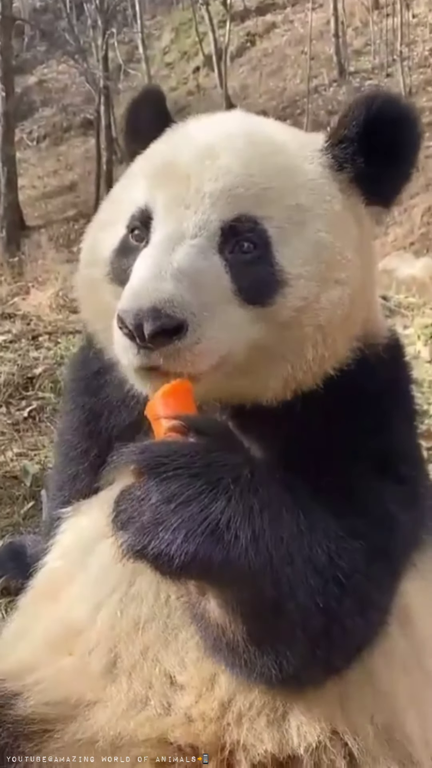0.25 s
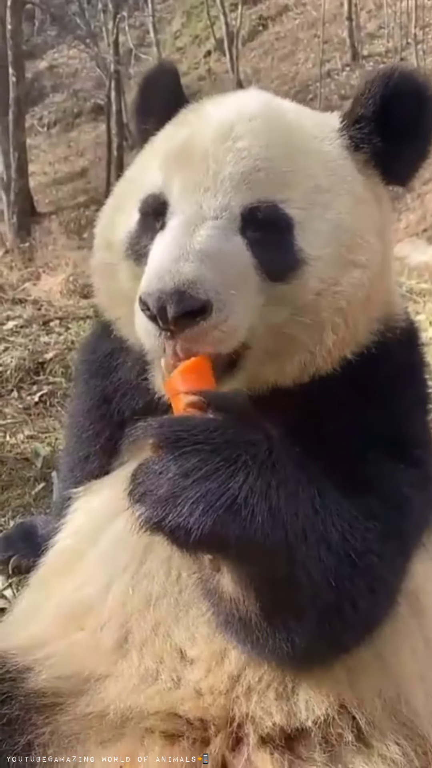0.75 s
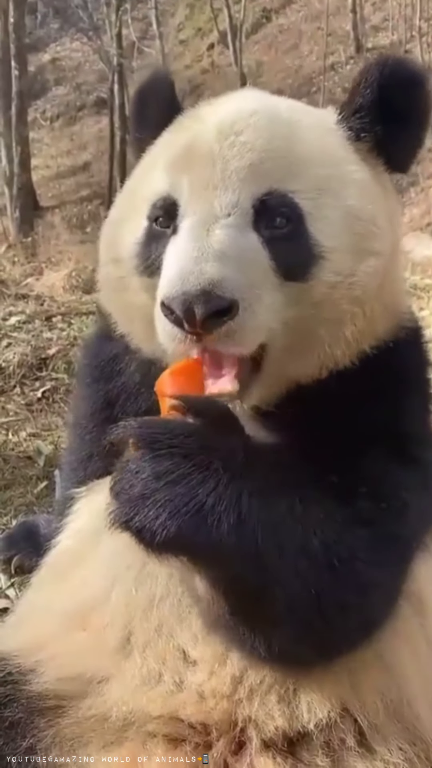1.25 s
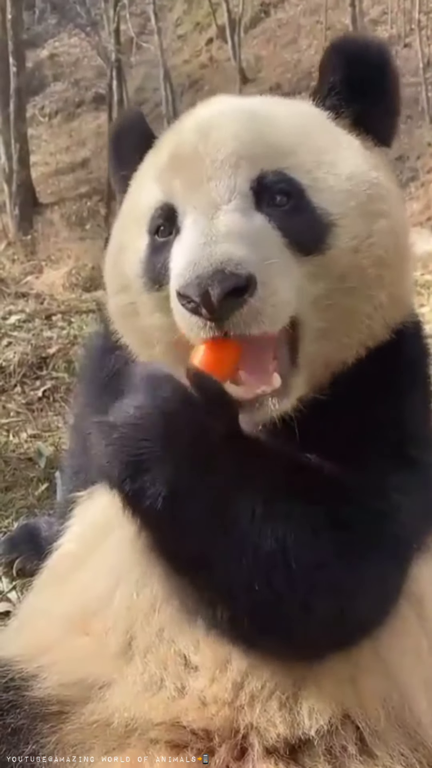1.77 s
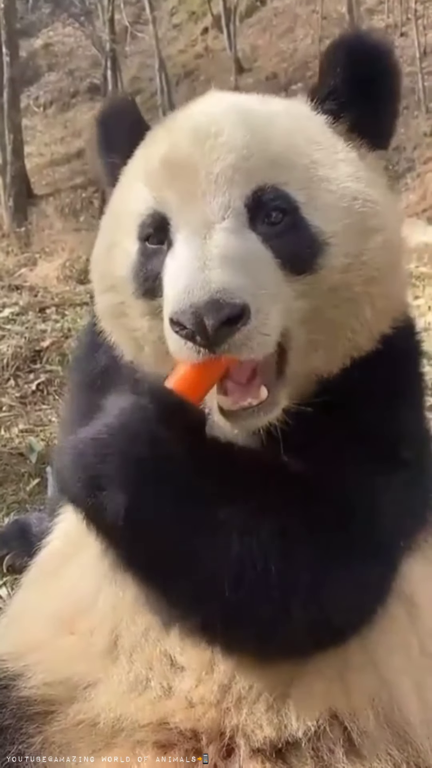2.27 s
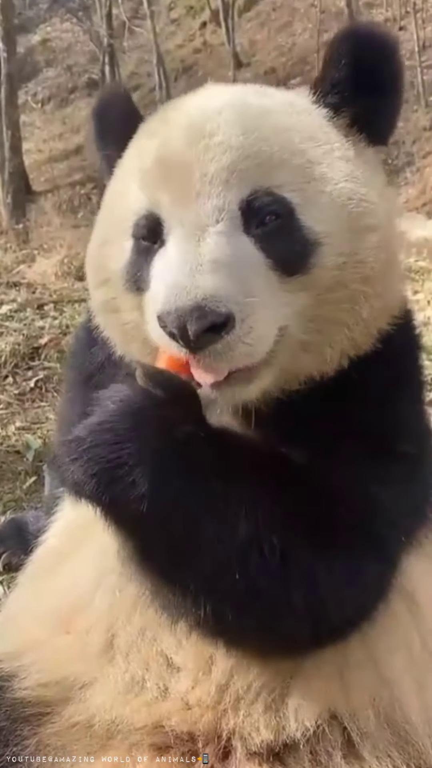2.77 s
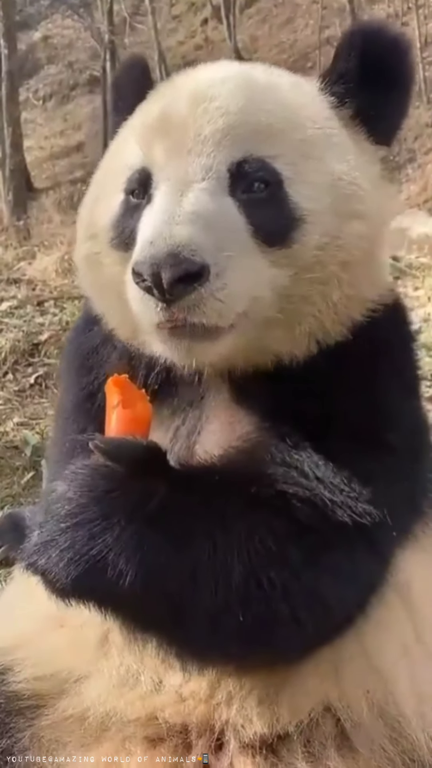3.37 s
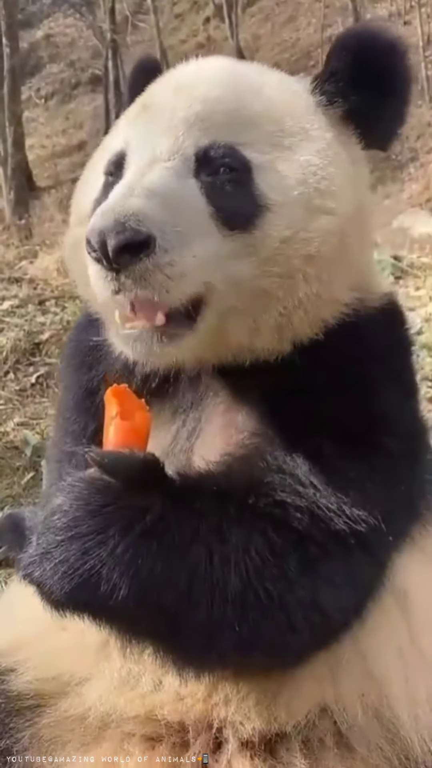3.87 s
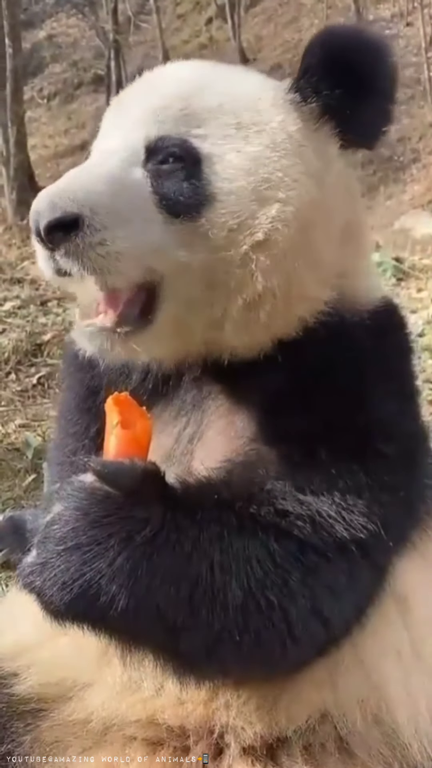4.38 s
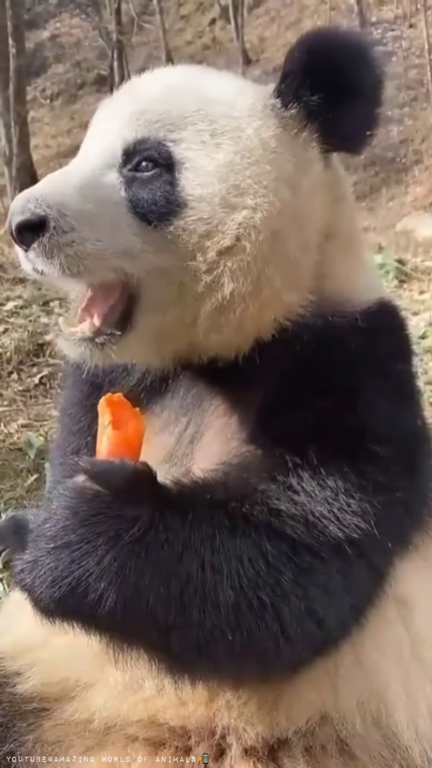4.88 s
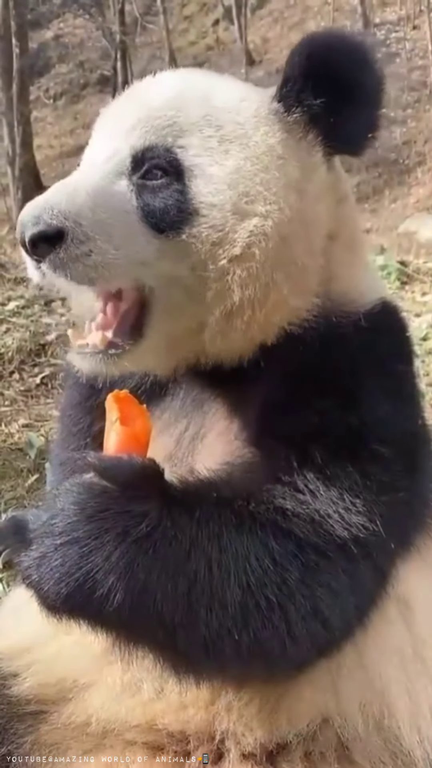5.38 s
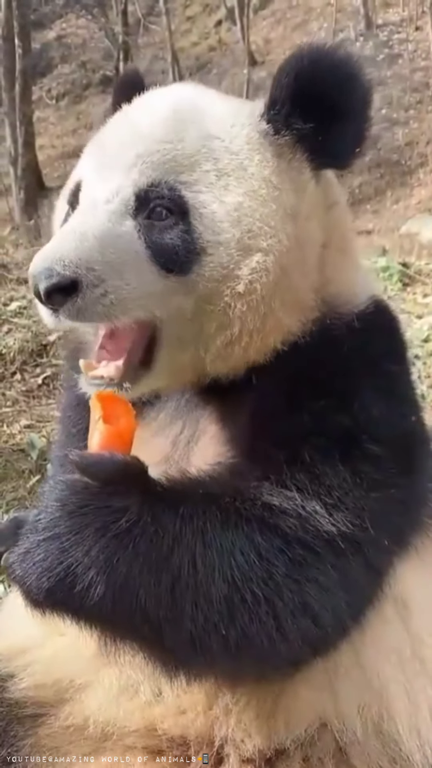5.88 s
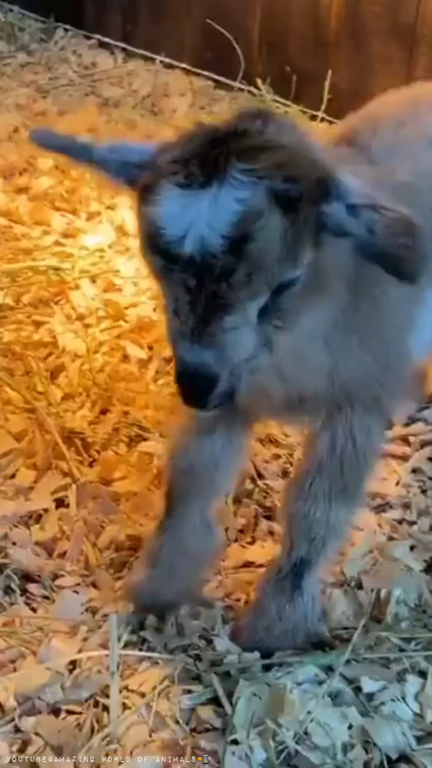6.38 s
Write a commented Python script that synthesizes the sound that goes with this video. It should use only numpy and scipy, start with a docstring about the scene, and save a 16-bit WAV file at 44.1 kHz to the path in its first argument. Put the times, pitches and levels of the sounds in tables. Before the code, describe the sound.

A panda chews raw carrot very close by, crisp wet open-mouthed crunches with a loud cracking bite midway, over faint outdoor hiss.

```python
"""Crisp, wet open-mouthed chewing is heard close by: a panda eats a raw carrot outdoors on a still day.
Halfway through it bites off a new piece with a loud crack, and chews on.
Each jaw stroke swells and ebbs as a swarm of tiny fractures and wet pops, filtered by the mouth's resonances.
Sharp snaps, ticks of the lips, plops of the tongue and dull knocks stand out singly as damped bursts and tones.
Beneath lie a low rustle and a faint hiss of air, both filtered noise; loud top treble is wider in stereo."""
import sys
import numpy as np
from scipy import signal
from scipy.fft import rfft, irfft
from scipy.io import wavfile
from scipy.ndimage import uniform_filter1d, map_coordinates

SR = 44100
rng = np.random.default_rng(int(sys.argv[2]) if len(sys.argv) > 2 else 0)


def file_out(sig):
    """Save sig as 16-bit WAV at sys.argv[1]."""
    # one column per channel
    cols = np.atleast_2d(sig).T
    # limit, then scale
    lim = np.clip(cols, -1, 1)
    pcm = np.round(lim * 32767).astype(np.int16)
    wavfile.write(sys.argv[1], SR, pcm)


N = 292824
TIME = np.arange(N) / SR  # [s]

# Strokes of the jaw: (start [s], pressing time [s], easing time [s], peak crunch level [dB],
# hollow of the mouth re crunch [dB], juicy fizz re crunch [dB], deep hollow [Hz], front cavity [Hz])
JAW_STROKES = [(0, 0.006, .13, -39, -3.5, -1.5, 710, 1770), (0.25, 0.013, 0.037, -27, -7.5, -5, 770, 2300),
               (0.402, 0.1, 0.051, -39, 2, -1.5, 740, 1830), (.562, .013, 0.038, -41.5, -5, -5, 710, 2080),
               (0.679, 0.021, 0.09, -38, -9.5, -2.5, 800, 1900),
               (0.851, 0.07, 0.092, -33.5, -3.5, 0, 770, 2370),
               (1.154, 0.027, 0.031, -29.5, -4, -4, 666, 1460),
               (1.313, 0.03, 0.065, -35, -11, -0.5, 770, 2440),
               (1.35, 0.081, 0.067, -42, -0.5, -7, 760, 2190),
               (1.454, 0.041, 0.0068, -42, -19, 2, 770, 2020),
               (1.57, 0.018, 0.21, -57.5, -7, 9.5, 810, 1870),
               (1.667, 0.031, 0.031, -35.5, -3, 2.5, 806, 1880),
               (1.891, 0.019, 0.13, -55, -5, 12, 777, 2220),
               (2.505, 0.029, 0.038, -41.5, -1, 14, 657, 2110),
               (2.581, 0.027, 0.036, -37.5, -10, 9.5, 566, 2230),
               (2.673, 0.014, 0.019, -38, -18, -5, 624, 2207), (3.026, 0.086, 0.11, -26, -8, -1, 734, 2270),
               (3.172, 0.037, 0.029, -39, -10, -1, 947, 1780),
               (3.361, 0.0096, 0.037, -34, -0.5, 0, 613, 1930),
               (3.526, 0.085, 0.084, -29, -7, 3, 800, 2170), (3.644, 0.033, 0.03, -37, 3, 0.5, 710, 2020),
               (3.786, 0.017, 0.054, -37.5, -10.5, -2.5, 603, 2530),
               (4.011, 0.075, 0.061, -37.5, -10.5, -0.5, 710, 2030),
               (4.08, 0.023, 0.081, -35.5, -1.5, -1.5, 653, 2550),
               (4.269, 0.017, 0.046, -31, -11.5, -2.5, 680, 1990),
               (4.469, 0.089, 0.067, -41, -7, -6, 890, 1750),
               (4.74, 0.023, 0.039, -30, -7.5, -4, 746, 1390),
               (4.932, 0.022, 0.082, -40, -4, -6, 810, 2040),
               (4.99, 0.067, 0.049, -43.5, -6.5, -8, 775, 2060),
               (5.185, 0.01, 0.068, -22, -15.5, -10.5, 980, 2200),
               (5.26, 0.023, 0.013, -32, -5.5, -6.5, 770, 1610),
               (5.422, 0.055, 0.094, -33, -3, 1, 850, 2170), (5.589, 0.013, 0.012, -39.5, -5, 0, 740, 2300),
               (5.649, .012, 0.067, -48.5, -15, -12.5, 746, 2070),
               (5.712, 0.053, 0.016, -33, -8, -2, 695, 1720),
               (5.901, 0.081, 0.068, -32.5, -4, 0.5, 783, 2350),
               (6.074, 0.018, 0.02, -42, -15.5, -5, 753, 2204)]


def gain_of(db):
    """The decibel is logarithmic: 20 dB is a factor of ten in amplitude."""
    return 10 ** (np.asarray(db) / 20)


def evened(x):
    """Normalization by the root mean square, which measures mean power: scales to rms 1."""
    return x / np.sqrt(np.mean(x ** 2) + 1e-20)


def steadied(x, size=1300):
    """Short-time power normalization: a window of size samples evens the level but keeps single grains."""
    power = uniform_filter1d(uniform_filter1d(x ** 2, size), size)
    return x / np.sqrt(abs(power) + 1e-20)


def follow(rows, t):
    """Linear interpolation: each column of a curve at the times t."""
    s, *columns = np.transpose(rows)
    return [np.interp(t, s, column) for column in columns]


def add(mix, s, sound):
    """Superposition: sound pressures add, here from time s on."""
    part = mix[max(round(s * SR), 0):][:len(sound)]
    part += sound[:len(part)]


def band(x, lo_hz, hi_hz, order=2):
    """Causal band-pass filtering by a Butterworth response, flat inside the band."""
    sos = signal.butter(order, [lo_hz, min(hi_hz, .48 * SR)], "band", fs=SR, output="sos")
    return signal.sosfilt(sos, x)


def resonate(x, hz, width_hz):
    """A damped resonator of peak gain 1: a complex one-pole in a frame that turns with the moving pitch."""
    turn = np.exp(2j * np.pi * np.cumsum(hz * np.ones(len(x))) / SR)
    r = np.exp(-np.pi * width_hz / SR)
    ringing = signal.lfilter([1 - r], [1, -r], x / turn + 1e-18)
    return 2 * (turn * ringing).real


def air():
    """Stationary noise with a shaped spectrum: the faint steady hiss of the open air."""
    # Spectrum of the hiss: (frequency [Hz], relative level per Hz [dB])
    spectrum = [(20, -19), (50, 16), (100, 10.5), (250, 5), (700, -0.5), (4000, -6), (9000, -13),
                (13000, -8.5)]
    hz, db = np.transpose(spectrum)
    shape = gain_of(np.interp(np.log(np.fft.rfftfreq(N, 1 / SR) + 1), np.log(hz), db))
    hiss = irfft(rfft(rng.standard_normal(N)) * shape, N)
    return gain_of(-60) * evened(hiss)


def rustle():
    """Low-frequency friction noise under a slow envelope, as the animal shifts."""
    # Rustle of the moving body: (time [s], level [dB])
    envelope = [(0, -45), (.17, -48), (.36, -63), (.6, -109), (3.4, -64.5), (3.5, -51.5), (3.66, -50),
                (3.8, -68.5), (6.1, -85)]
    return gain_of(follow(envelope, TIME)[0]) * evened(band(rng.standard_normal(N), 110, 215))


def thud(hz, level_db, decay_s, halving_s):
    """A damped oscillation of sinking pitch with a little noise: a soft, dull knock."""
    t = np.arange(SR // 5) / SR
    turns = np.cumsum(hz * .5 ** (t / halving_s)) / SR
    knock = np.sin(2 * np.pi * turns) + .3 * evened(band(rng.standard_normal(len(t)), hz / 2, hz * 2))
    return gain_of(level_db) * knock * (1 - np.exp(-t / 0.00059)) * np.exp(-t / decay_s)


def tongue_db():
    """Amplitude envelope of the tongue working the pulp; it dips slightly before each stroke."""
    # Crunch level of the tongue's murmur before these dips: (time [s], level [dB])
    murmur = [(0, -52.5), (1.9, -58.5), (2.4, -70.5), (2.9, -59), (3.4, -55.5), (4.2, -61.5), (4.7, -55.5),
              (5.15, -62), (5.4, -52.5), (6.1, -59)]
    still_s, still_db = 0.055, -1.5  # the pause: time scale and depth
    pauses = [np.exp(-((TIME - start + still_s / 2) / still_s) ** 2) for start, *_ in JAW_STROKES]
    return follow(murmur, TIME)[0] + still_db * np.max(pauses, 0)


def strokes():
    """Incoherent sources add in power: strokes add to the tongue's murmur. Returns crunch, hollow and fizz [dB].

    The hollow and the fizz are relative to the crunch.
    """
    tongue_hollow_db, tongue_fizz_db = -4, 0.5  # re the tongue's crunch
    swell_db, ebb_db, arch_power = 13, 21, 1.63  # rise as the teeth press, fall as they ease
    attack_s, release_s = 0.0017, 0.01  # outside the arch: onset before it, decay after it
    # the mouth closes during a stroke: change from start to peak, and again from peak to end
    hollow_grows_db, fizz_fades_db = 4, 0.5
    power = gain_of(2 * (tongue_db() + np.array([[0], [tongue_hollow_db], [tongue_fizz_db]])))
    for start, press_s, ease_s, level_db, hollow_db, fizz_db, _, _ in JAW_STROKES:
        t = TIME - start - press_s  # zero at the peak
        phase = np.interp(t, [-press_s, 0, ease_s], [-1, 0, 1])
        arch_db = np.where(t < 0, swell_db, ebb_db) * abs(phase) ** arch_power
        edges = np.maximum(-t - press_s, 0) / attack_s + np.maximum(t - ease_s, 0) / release_s
        on = edges < 10
        hollow_now_db = hollow_db + hollow_grows_db * phase[on]
        fizz_now_db = fizz_db - fizz_fades_db * phase[on]
        colour_db = np.array([0 * phase[on], hollow_now_db, fizz_now_db])
        power[:, on] += (gain_of(level_db - arch_db[on] + colour_db) * np.exp(-edges[on])) ** 2
    crunch, hollow, fizz = 10 * np.log10(power)
    return crunch, hollow - crunch, fizz - crunch


def mouth_hz(t):
    """Cavity resonances shift with shape: deep hollow and front cavity glide from stroke peak to stroke peak."""
    shapes = [(start + press_s, deep, front) for start, press_s, *_, deep, front in JAW_STROKES]
    return follow(shapes, t)


def fractures(n, per_s, spread_db):
    """A random impulse process of bursting cells: many small clicks, a few large, of either sign."""
    chance, size, sign = rng.random((3, n))
    size_db = spread_db * np.minimum(-np.log(1 - size), 4)
    return (chance < per_s / SR) * gain_of(size_db) * np.where(sign < .5, -1, 1)


def tears(per_s, spread_db, decay_s, count=12):
    """Impulses convolved with decaying noise: a swarm of tearing cell walls in count random colours."""
    t = np.arange(SR // 150) / SR
    out = np.zeros(N)
    clicks = fractures(N, per_s, spread_db)
    kind = rng.integers(0, count, N)
    for k in range(count):
        tear = evened(rng.standard_normal(len(t)) * np.exp(-t / decay_s))
        out += signal.oaconvolve(clicks * (kind == k), tear)[:N]
    return evened(out)


def bubbles(per_s, spread_db, top_hz, ring_s, glide):
    """Damped resonance of popping juice films: low ones ring longer, and each slides up or down in pitch."""
    at = np.flatnonzero(rng.random(N) < per_s / SR)
    size, pitch, slide = rng.random((N, 3))[at].T[:, :, None]
    hz = 550 + (top_hz - 550) * pitch ** 2
    life = ring_s * np.sqrt(2000 / hz)  # ring_s is the decay time at 2000 Hz
    t = np.arange(SR // 90) / SR
    height = gain_of(spread_db * np.minimum(-np.log(1 - size), 3.5)) * np.sqrt(hz)
    turns = hz * t * (1 + glide * (slide - .5) * t / t[-1])
    pops = height * np.exp(-t / life) * np.sin(2 * np.pi * turns)
    places = at[:, None] + np.arange(len(t))
    return evened(np.bincount(places.ravel(), pops.ravel(), N)[:N])


def saliva(level_db):
    """Sparse impulsive ticks and pops of tongue and lips, which go on between the strokes."""
    ticks = band(tears(per_s=34, spread_db=12, decay_s=0.00038), 3200, 13000)
    pops = bubbles(per_s=45, spread_db=5, top_hz=4200, ring_s=0.0018, glide=0.2)
    return gain_of(0.51 * level_db) * (gain_of(-37) * ticks + gain_of(-31.0) * pops)


def tick(level_db):
    """An impulsive release as a film of saliva breaks between the lips: a tiny decaying burst of treble."""
    t = np.arange(SR // 50) / SR
    burst = rng.standard_normal(len(t)) * np.exp(-t / 0.0028)
    return gain_of(level_db) * band(burst, 4800, 11500) * 2


def plop(hz, level_db):
    """Cavity resonance: an opening pocket of air rings the deep hollow, with a little wet splash."""
    t = np.arange(SR // 20) / SR
    splash = gain_of(-6.5) * evened(band(rng.standard_normal(len(t)), 1100, 3300))
    ring = 2 * np.sin(2 * np.pi * hz * t)
    return gain_of(level_db) * (ring + splash) * (1 - np.exp(-t / 0.0015)) * np.exp(-t / 0.0036)


def snap(s, length_s, ring_hz, level_db, hollow_db, fizz_db):
    """Brittle fracture: a crack runs through the carrot in milliseconds and excites the mouth's resonances."""
    t = np.arange(SR // 20) / SR
    tearing = evened(fractures(len(t), per_s=4300, spread_db=7.0)) + .5 * rng.standard_normal(len(t))
    crack = tearing * (np.exp(-(t / length_s) ** 3) + gain_of(-14.5) * np.exp(-t / (length_s + 0.0015)))
    crack *= 1 - np.exp(-t / (0.067 * length_s))  # it gathers strength over a small share of its length
    deep_hz = mouth_hz(s)[0]
    crunch = evened(band(crack, 1700, 3200, order=3))
    front_ring = resonate(resonate(crack, ring_hz, 180), ring_hz, 900)
    crunch = evened(crunch + gain_of(7) * evened(front_ring))
    hollow = evened(band(crack, 580, 1800, order=3))
    deep_ring = resonate(resonate(crack, deep_hz, 72), deep_hz, 300)
    hollow = evened(hollow + gain_of(34.0) * evened(deep_ring))
    lips_hz = np.clip(12000 * gain_of(0.95 * fizz_db), 5800, 12400)  # nearly closed lips dull the top
    fizz = band(crack, 3900, lips_hz, order=3)
    overtone_hz = max(2 * ring_hz, 4400)  # a higher mode of the same cavity
    fizz = evened(fizz + resonate(fizz, overtone_hz, 1500))
    colour = crunch + gain_of(hollow_db) * hollow + gain_of(fizz_db) * fizz
    return gain_of(level_db) * np.sqrt(length_s / t[-1]) * colour  # the level holds over the crack's length


def clumps(depth_db, rate_hz):
    """Random amplitude modulation: the flesh gives way in fits, so the grains come in irregular clumps."""
    return gain_of(depth_db * np.tanh(evened(band(rng.standard_normal(N), rate_hz / 4, rate_hz))))


def chewing(level_db, hollow_db, fizz_db):
    """Source and filter: grains of ground pulp sound through front cavity, deep hollow and open lips."""
    deep_hz, front_hz = mouth_hz(TIME)
    dry = tears(per_s=1700, spread_db=4.0, decay_s=0.0011)
    wet = bubbles(per_s=3500, spread_db=4.5, top_hz=10910, ring_s=0.0036, glide=0.12)
    pulp = steadied(dry + gain_of(-7) * wet + gain_of(-7.0) * rng.standard_normal(N), size=900)
    crunch = steadied(band(pulp, 1050, 4380, order=3))
    front_ring = resonate(resonate(pulp, front_hz, 160), front_hz, 1100)
    crunch = steadied(crunch + gain_of(-6.5) * steadied(front_ring))
    hollow = band(pulp, 420, 1150, order=3)
    hollow = steadied(hollow + gain_of(7.0) * resonate(hollow, deep_hz, 62))
    fizz = band(pulp, 3250, 13000, order=4)
    lips_ring = gain_of(2.5) * resonate(fizz, 6300, 1800)
    fizz = steadied(gain_of(0.15 * fizz_db) * fizz + lips_ring)  # juicier is also brighter
    jaw = gain_of(-15.5) * steadied(band(dry, 240, 540))
    colour = crunch + gain_of(hollow_db) * (hollow + jaw) + gain_of(fizz_db) * fizz
    # the bulk of the head passes a dull grinding that grows more slowly than the crunch
    grinding = gain_of(-39.5 + 0.58 * level_db) * steadied(band(rng.standard_normal(N), 64, 140))
    return gain_of(level_db) * clumps(depth_db=3.0, rate_hz=57.3) * colour + grinding


def shifting(x, patchy_db, size=128):
    """Time-varying filtering: air pockets between sliding morsels lift and damp narrow bands for a moment."""
    z = signal.stft(x, nperseg=2 * size, noverlap=3 * size // 2)[2]
    patches = rng.standard_normal(z.shape)
    for _ in range(2):
        patches = uniform_filter1d(patches, size=3, axis=0)  # across frequency
        patches = uniform_filter1d(patches, size=12, axis=1)  # across time
    colour = evened(gain_of(patchy_db * np.clip(evened(patches), -2, 2)))
    return signal.istft(z * colour, nperseg=2 * size, noverlap=3 * size // 2)[1][:N]


def palate(x, delays_s, echo_db, sway):
    """Comb-filter interference: short echoes between teeth, palate and paw; paths change as the head moves."""
    out = x.copy()
    for k, delay_s in enumerate(delays_s):
        swing = np.sin(2 * np.pi * (TIME * rng.uniform(.5, 1) + rng.random()))
        lag = SR * delay_s * (1 + sway * swing)
        echo = map_coordinates(x, [np.arange(N) - lag], order=3, prefilter=False)
        out += (-1) ** k * gain_of(echo_db) * echo
    return out / np.sqrt(1 + len(delays_s) * gain_of(2 * echo_db) / 2)


def widen(x):
    """Decorrelation: top treble, convolved with a short decaying noise, makes a side signal that widens the image."""
    t = np.arange(SR // 50) / SR
    tail = rng.standard_normal(len(t)) * np.exp(-t / .003)
    decorrelated = signal.oaconvolve(x, tail / np.linalg.norm(tail))[:N]
    return gain_of(-16.5) * band(decorrelated, 6000, 13000, order=6)


def scene():
    """Mid-side superposition: all sounds stand in the middle; only the top treble is a little wider."""
    # Single fractures: (time [s], length [s], ring [Hz], level [dB], hollow re level [dB], fizz re level [dB])
    cracks = [(0.08, 0.0054, 1750, -38, -30, -17), (0.14, 0.0071, 1520, -44, -19, 4.5),
              (0.206, .0038, 2000, -42, -18, -2), (.229, 0.01, 3500, -37, -17, 0),
              (0.25, 0.021, 2180, -40.5, 6.5, -9), (0.297, .018, 2400, -34, 1.5, -2),
              (.402, 0.0033, 2280, -39.5, -22, -23), (0.462, 0.0023, 1190, -40.5, 3, 10.5),
              (0.499, 0.0007, 1770, -43, -5, 16), (0.6774, 0.0038, 3700, -30.5, -34, 0),
              (0.691, 0.0032, 2350, -30, -8, 2), (0.7052, 0.001, 1650, -17.5, -6.5, -13),
              (0.734, 0.016, 2300, -34.5, -2.5, -2), (0.739, 0.015, 1840, -30.5, -3.5, -11),
              (.8455, 0.002, 3500, -46.5, -19, 9), (0.87, 0.0076, 3720, -46, -4, 17),
              (0.907, 0.01, 2310, -36, 2.5, 11), (1.0376, 0.0046, 4070, -33, -14, -2),
              (1.103, 0.0047, 3060, -32.5, -25, -2), (1.576, 0.0057, 1100, -42.5, 1, 0.5),
              (1.589, 0.006, 2910, -41.5, -25, 1.5), (1.663, 0.0045, 3300, -44, -30, 9.5),
              (1.6974, 0.0035, 1740, -25, -8, -5.5), (1.873, 0.0089, 2250, -44.5, -1, 4.5),
              (1.9144, 0.0067, 2310, -46, -3, 2.5), (2.039, 0.0027, 2440, -37, -35, -26),
              (2.528, 0.0082, 4070, -34, -20, -2), (2.564, 0.011, 3510, -36.5, -5, 0),
              (2.5824, 0.01, 2520, -25, 0.5, -14), (2.5852, 0.0097, 3560, -22, -6, 13),
              (2.591, .011, 2090, -23.5, 1, 0.5), (2.675, 0.001, 2300, -37.5, -1, 7),
              (3.083, 0.0028, 1680, -18, -8.5, -5), (3.091, 0.00085, 1900, -14, 2.5, -3),
              (3.098, 0.00077, 2980, -12, -14, -2), (3.122, 0.0052, 2180, -19, -8.5, -3),
              (3.128, 0.011, 2230, -23.5, -6.5, 0), (3.221, 0.0055, 1420, -35, -19, -2),
              (3.367, 0.0014, 1840, -23, -4.5, -24), (3.4754, 0.002, 1720, -40, -12, -8),
              (3.486, 0.0069, 1700, -44, -2.5, -9), (3.551, .0048, 2190, -39, -2, 6),
              (3.564, 0.0027, 2150, -27, -4, 4), (3.594, .005, 1580, -27.5, -4.5, 2.5),
              (3.626, 0.025, 3200, -34, -25, 3.5), (4.097, 0.0027, 2540, -31, -3, -6),
              (4.282, 0.0086, 1960, -31.5, -29, -3.5), (4.301, 0.016, 2070, -32.5, -7.5, -12),
              (4.647, 0.0096, 2080, -42, -16, -2), (4.752, 0.017, 1290, -23.5, -13, -2.5),
              (4.7776, 0.007, 2060, -25, -12.5, -29), (4.9917, 0.012, 2200, -37.5, -26, -3.5),
              (5.195, 0.017, 1635, -20, -30, -5), (5.229, 0.0046, 4100, -24.5, -33, -3.5),
              (5.268, 0.013, 1680, -35.5, -22, -20), (5.33, 0.003, 1720, -32.5, -9, -35),
              (5.427, 0.0083, 1550, -40.5, 4.5, 3), (5.59, 0.0037, 2340, -34, -22, -9),
              (5.651, 0.0066, 1680, -39, -7.5, -26), (5.704, 0.007, 1350, -45, -9, 12.5),
              (5.724, 0.0072, 4000, -31, -1.5, -4.5), (5.748, 0.0021, 1700, -20.5, -24, -1.5),
              (5.762, 0.0082, 1660, -31, -8, -5), (5.948, 0.0049, 3200, -29.5, -0.5, 8),
              (5.964, 0.0026, 3540, -24.5, -3.5, -8)]
    # Ticks of parting lips: (time [s], nominal level [dB])
    lip_ticks = [(.6062, -31.5), (0.657, -45), (1.024, -39), (1.081, -42), (1.119, -35), (1.146, -31),
                 (1.525, -36), (1.632, -34.5), (2.001, -40), (2.195, -42.5), (2.3093, -46.5), (2.508, -30),
                 (2.874, -42), (3.266, -37.5), (3.297, -50), (3.422, -40), (4.04, -24), (5.113, -43),
                 (5.684, -40), (6.1423, -33.5)]
    # Plops as the tongue lets go of the palate: (time [s], pitch [Hz], nominal level [dB])
    tongue_plops = [(1.076, 756, -40), (1.234, 760, -29.5), (1.2945, 775, -33.5), (1.3135, 740, -32.5),
                    (2.951, 720, -37), (5.815, 760, -36), (5.904, 833, -28)]
    # Dull knocks of jaw and paw: (time [s], starting pitch [Hz], nominal level [dB], decay [s],
    # time for the pitch to halve [s])
    knocks = [(2.154, 110, -51.5, 0.036, 0.083), (2.238, 170, -45.5, 0.0058, 0.023),
              (2.31, 240, -69, 0.007, .05), (2.587, 294, -32, 0.012, .05), (2.599, 107, -35, 0.03, 0.14),
              (3.085, 313, -37, .025, 0.16), (3.096, 126.5, -37, .05, 0.25),
              (3.367, 226, -46.5, 0.02, 0.043), (4.887, 513, -50, 0.025, .012),
              (5.956, 114, -47.5, 0.074, 0.26)]
    level_db, hollow_db, fizz_db = strokes()
    mouth = shifting(chewing(level_db, hollow_db, fizz_db), patchy_db=3.5) + saliva(level_db)
    for s, *crack in cracks:
        add(mouth, s, snap(s, *crack))
    for s, tick_db in lip_ticks:
        add(mouth, s, tick(tick_db))
    for s, *pocket in tongue_plops:
        add(mouth, s, plop(*pocket))
    mouth = palate(mouth, delays_s=[.0007, .0013, .0023], echo_db=-17.5, sway=0.25)
    for s, *knock in knocks:
        add(mouth, s, thud(*knock))
    # the treble widens with level: 0.41 dB more side for each dB of treble above -24.5 dB
    widening_db = 0.41 * (level_db + fizz_db + 24.5)
    side = widen(mouth * gain_of(widening_db))
    mid = mouth + rustle() + air()
    return np.array([mid + side, mid - side])


def record(dry):
    """Saturation rounds off the loudest peaks; the sound stops dead at the end; a steep low-pass limits the band."""
    ceiling, stop_s, edge_hz = .72, 6.16, 13050  # ceiling in units of full scale
    rounded = ceiling * np.tanh(dry / ceiling)
    cut = rounded * np.clip((stop_s - TIME) * SR / 64, 0, 1)  # a ramp of 64 samples
    low_pass = signal.firwin(141, edge_hz, window=("kaiser", 8), fs=SR)
    return signal.oaconvolve(cut, low_pass[None], "same")


dry = scene()
out = record(dry)
file_out(out)
```